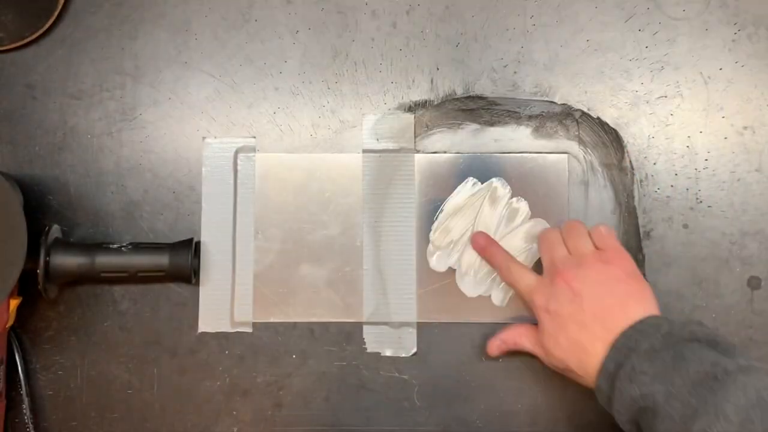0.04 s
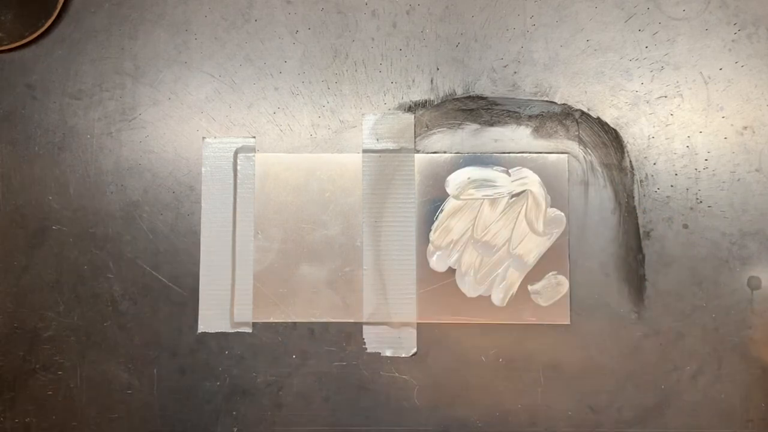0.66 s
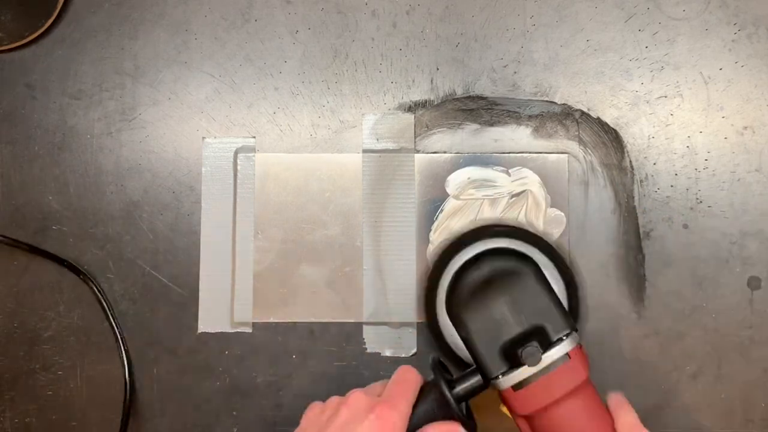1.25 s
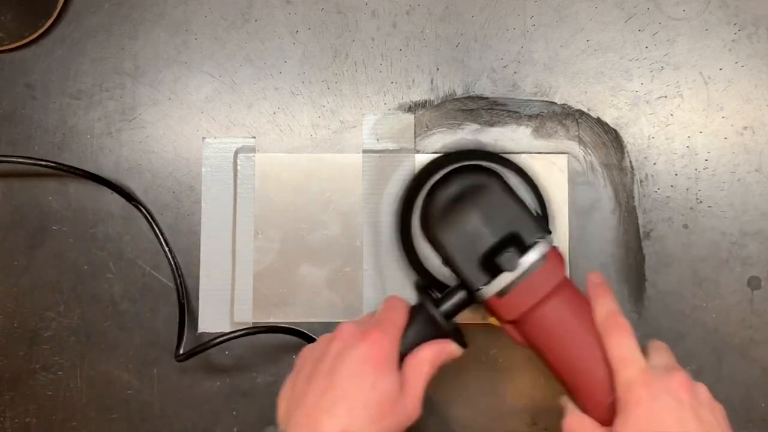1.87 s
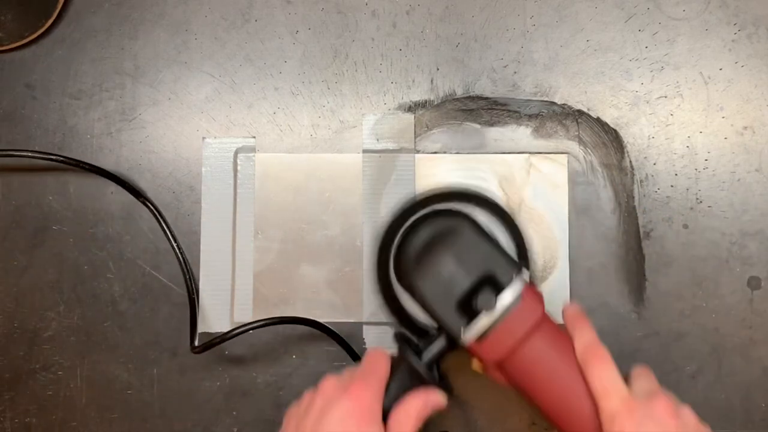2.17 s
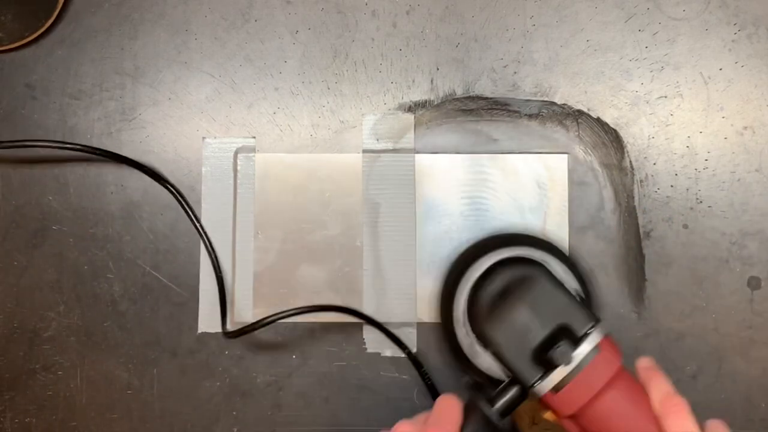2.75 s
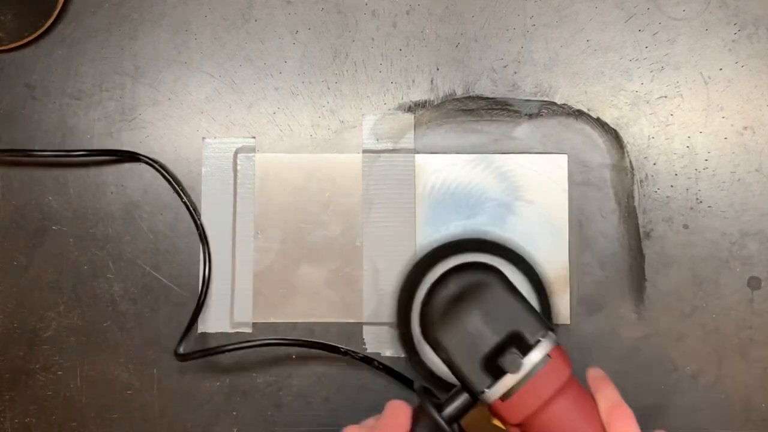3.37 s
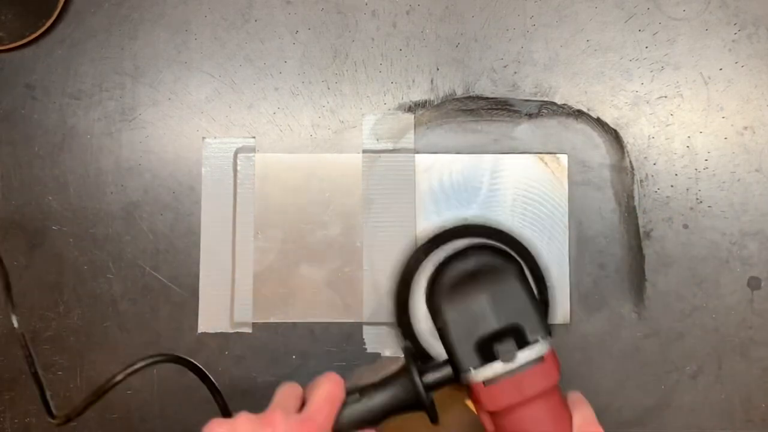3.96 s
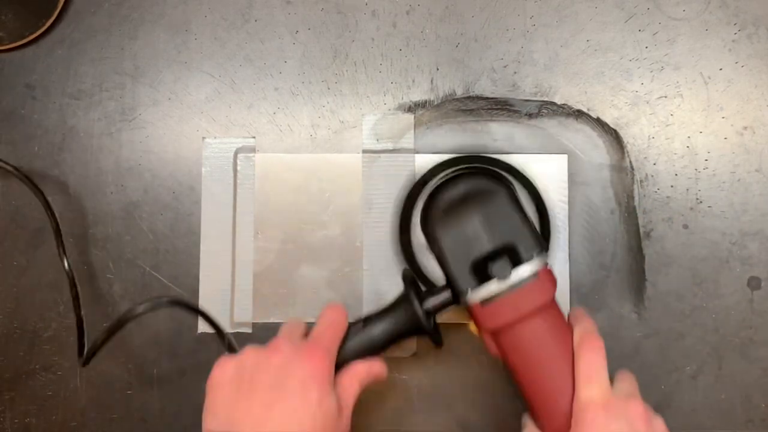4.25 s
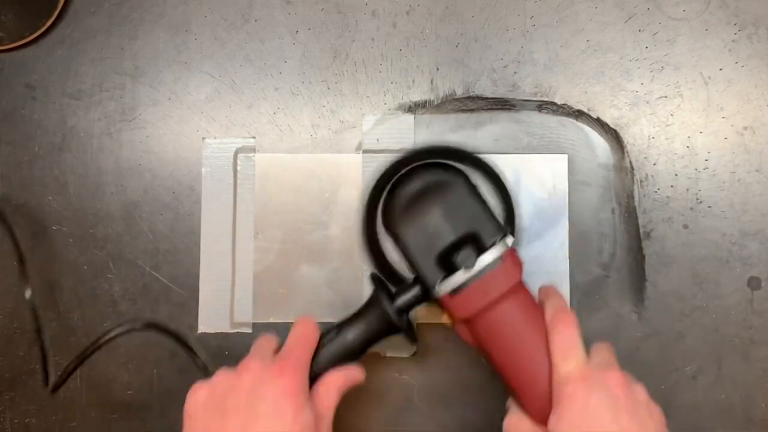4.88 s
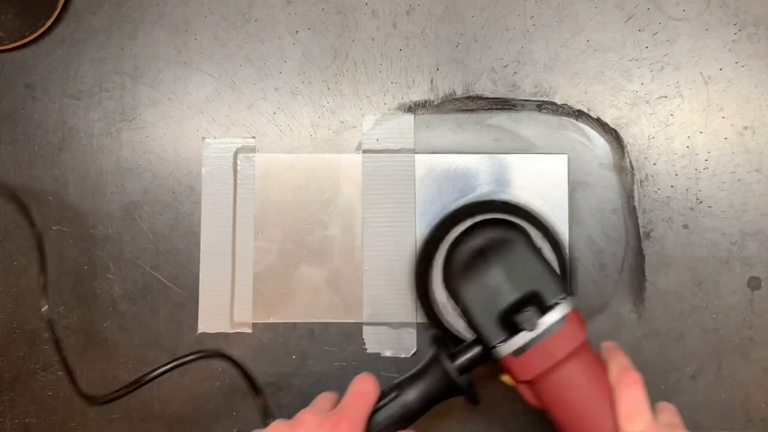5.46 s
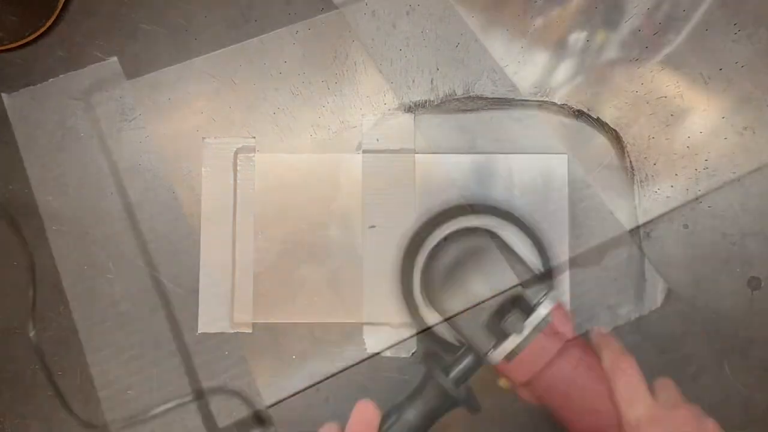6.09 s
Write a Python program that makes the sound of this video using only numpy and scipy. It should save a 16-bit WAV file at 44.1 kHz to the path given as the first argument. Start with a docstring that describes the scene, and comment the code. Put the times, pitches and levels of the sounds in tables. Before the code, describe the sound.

In a quiet workshop, a few knocks, clicks and a short rub come from a power tool being lifted off a steel bench. Then the polisher starts, spinning up fast to an even, slightly wavering motor whine with a strong airy hiss as its foam pad works over a metal plate. It keeps running and gets a little quieter at the very end. The microphone is close.

```python
"""Knocks and a soft scrape come first, as a dual-action polisher is picked up from a steel bench.
It is then switched on and run over a taped-down metal plate. Rotor unbalance gives a hum and tooth
contact a gear whine; brushes, cooling air and the foam pad give a hiss shaped by the housing resonances.
The sound is close and nearly mono, in a quiet workshop, and fades a little at the very end."""
import sys
import numpy as np
from scipy import signal
from scipy.fft import rfft, irfft, next_fast_len
from scipy.io import wavfile
from scipy.ndimage import uniform_filter1d

SR = 44100
rng = np.random.default_rng(int(sys.argv[2]) if len(sys.argv) > 2 else 0)


def generate_wav(sig):
    """Save sig (samples, or channels by samples) to the path in sys.argv[1] as 16-bit PCM at SR."""
    pcm = np.round(np.clip(np.atleast_2d(sig).T, -1, 1) * 32767).astype(np.int16)
    wavfile.write(sys.argv[1], SR, pcm)


N = 274125
T = np.arange(N) / SR


def polisher(switch_on_s=1.2795, onset_s=0.0027, waver=0.003044):
    """Frequency modulation: the orbiting pad makes the rotor waver, and hum, gears and rush follow."""
    # rotor starting, then running: t/s, rotation rate f/Hz, hum level/dB
    run_up = [(1.28, 39.99, -77), (1.305, 190.1, -56)]
    running = [(1.33, 295, -36), (1.36, 339, -30.5), (1.37, 355, -30), (1.38, 377, -44), (1.4, 395, -34.5),
               (1.42, 410, -30), (1.45, 427.5, -29), (1.52, 439.8, -27.5), (1.6, 445.4, -28),
               (1.71, 446.4, -29.5), (1.74, 444.7, -26.5), (1.86, 447, -29.5), (2.12, 442, -28),
               (2.36, 439.6, -29), (2.4, 440.5, -27), (2.49, 444, -30.5), (2.62, 442.6, -27.5),
               (2.68, 442.5, -30.5), (2.72, 442.8, -26), (2.76, 443, -30.5), (2.83, 441.4, -25.5),
               (2.88, 440.4, -30), (2.93, 443.7, -27), (3.02, 441, -29), (3.14, 443.3, -27),
               (3.17, 443.2, -29), (3.22, 440, -26.5), (3.26, 440.3, -30.5), (3.34, 439, -27),
               (3.37, 439.2, -30), (3.48, 440.8, -26), (3.53, 440, -30.5), (3.59, 440.1, -26),
               (3.66, 436.5, -30), (3.71, 437, -25.5), (3.74, 439, -29), (3.82, 439.6, -28.5),
               (3.95, 440.5, -28.5), (4.02, 442, -25), (4.13, 440, -27), (4.23, 448, -26.5),
               (4.28, 441.6, -26), (4.34, 441.5, -28.5), (4.38, 438.7, -27), (4.77, 438.4, -26.5),
               (4.81, 437.3, -29.5), (4.88, 437.6, -26.5), (4.95, 438.3, -31), (4.97, 436, -27.5),
               (5.11, 433.3, -27.5), (5.44, 434.7, -27), (5.71, 437, -27.5), (5.85, 436, -27),
               (6.09, 437, -31), (6.14, 437, -30), (6.22, 437, -34.5)]
    # rush of brushes and air: t/s, level/dB
    rush_levels = [(1.29, -33), (1.36, -34.5), (1.74, -32.5), (4.4, -33), (5.76, -32.5), (5.99, -34),
                   (6.22, -37.5)]
    motion = run_up + list(running)
    hz, hum_db, rush_db = curve(motion), curve(motion, column=2), curve(rush_levels)
    turns = np.cumsum(hz * (1 + waver * walk(22.5))) / SR
    speed = hz / np.median(hz[T > 2])  # 1 at working speed
    sound = rotor(turns, hum_db, rush_db) + gears(turns, speed) + rush(turns, speed) * undb(rush_db)
    return sound * np.clip((T - switch_on_s) / onset_s, 0, 1)


def rotor(turns, hum_db, rush_db, cage_per_turn=0.41):
    """Forced vibration: unbalance hums once a turn; bearing play smears overtones, the higher the wider."""
    # overtones: multiple of the rotation rate, level/dB re the rush
    harmonics = [(2, -17), (3, -24.5), (4, -35), (5, -35.5), (6, -31), (7, -24), (8, -18.5), (9, -20),
                 (10, -29)]
    hum = unit(np.sin(2 * np.pi * turns) * (1 + 0.075 * walk(28))) * undb(hum_db)
    overtones = sum(undb(db) * rough_line(round(k) * turns, 6.2 * k, steady=0.72) for k, db in harmonics)
    cage = undb(-27.5) * rough_line(cage_per_turn * turns, 8.7, steady=2.5)
    return hum + (overtones + cage) * undb(rush_db)


def gears(turns, speed, mesh_per_turn=39 / 11):
    """Periodic tooth contact: narrow harmonics of the mesh rate swell with speed and load on the pad."""
    # whine under load, at working speed: t/s, level/dB
    load = [(1.45, -54), (1.54, -51), (1.66, -49), (2.17, -53.5), (2.63, -50), (3.13, -52), (3.24, -49.5),
            (3.47, -51), (3.7, -52.5), (3.78, -49), (3.85, -49), (3.93, -56.5), (4.55, -51), (4.65, -63),
            (4.98, -56), (5.05, -65), (5.1, -53), (5.36, -60), (5.42, -55), (5.6, -51), (5.87, -61),
            (5.92, -55), (6.22, -61)]
    # gear partials: multiple of the mesh rate, level/dB re the load curve
    partials = [(1, -1), (2, 0), (4, -4), (5, 1)]
    contacts = mesh_per_turn * turns
    whine = sum(undb(db) * rough_line(round(k) * contacts, 13.4, steady=2.3) for k, db in partials)
    return speed ** 4 * whine * undb(curve(load))


def rush(turns, speed, pulse_depth=0.29, grain_db=0.5, flutter_db=1.0):
    """Source and filter: brush and pad friction rings the housing; at low speed the brushes spark."""
    # spectra of friction and of sparking: f/Hz, relative level/dB
    friction_spectrum = [(25, -13.5), (110, -10.5), (240, -4.5), (340, -3), (560, -4), (1100, -8),
                         (2400, -5.5), (3700, 4), (5200, 0), (8600, -1), (10800, 1.5), (12600, -1),
                         (14000, -0.5), (15500, -5.5)]
    spark_spectrum = [(120, -43), (200, -16), (414, -34), (690, -27), (1620, -13), (2170, -10), (2380, -13),
                      (4330, -7), (8820, -7.5), (10000, 3), (15500, -10)]
    # housing resonances and one notch: f/Hz, width/Hz, gain/dB
    housing = [(1326, 60, 7.5), (1710, 58, 4.5), (2086, 106, 9.5), (2555, 170, 3.5), (3620, 390, 2),
               (4000, 100, 1.5), (4370, 130, 3.5), (6030, 190, -5.5), (7570, 450, 3), (9500, 240, 3),
               (13450, 450, 2)]
    pulse = 1 + pulse_depth * np.cos(2 * np.pi * turns)
    friction = rng.standard_normal(N) * pulse * undb(grain_db * walk(1500))
    running = unit(colour(friction, friction_spectrum, housing)) * undb(0.47 + flutter_db * walk(32))
    crackle = rng.standard_normal(N) * undb(2.2 * walk(900))
    sparks = unit(colour(crackle, spark_spectrum)) * (T < 1.5)
    running_share = np.clip(speed, 0, 1) ** 3
    return running * np.sqrt(running_share) + sparks * np.sqrt(1 - running_share)


def knocks(clack_spread=1.255):
    """Impact and damped vibration: the bench top thuds, the tool body clacks and hard parts click."""
    # tool and cord strike the bench: t/s, thud gain/dB, clack level/dB, click level/dB, clack f/Hz, T60/s
    contacts = [(0.301, -45, -58, -80, 1350, 0.034), (0.4428, -23.5, -34, -44.5, 890, 0.034),
                (0.484, -41, -47, -59, 1150, .07), (0.501, -61, -54.5, -59, 1600, 0.094),
                (0.575, -58, -45, -66, 900, .04), (0.583, -42, -43, -46, 1200, 0.035),
                (0.6004, -39.5, -52, -30.5, 1100, 0.022), (0.709, -70, -47, -58, 1720, 0.029),
                (0.719, -64, -43, -54, 1730, .025), (0.758, -67, -48, -70, 1670, 0.037),
                (0.805, -68, -55, -54.5, 1100, .05), (0.861, -60, -42, -66, 990, .03),
                (0.898, -35.5, -54, -50, 1300, .05), (0.907, -36, -55, -49, 1500, 0.045),
                (0.997, -64, -60, -55, 2500, 0.047), (1.038, -68, -56, -48, 2200, .025),
                (1.054, -72, -51, -52, 2500, .04), (1.0835, -50, -43, -36, 1700, 0.03),
                (1.130, -68, -62, -46, 1800, 0.022), (1.157, -75, -50.5, -62, 1290, .025),
                (1.327, -27, -54, -60, 600, .03)]
    # modes of the bench top: f/Hz, T60/s, relative level/dB
    bench_modes = [(230, 0.07, -21), (280, 0.056, -3.5), (412, .03, -20), (641, 0.055, -13),
                   (1030, .04, -28)]
    # click on the plastic body: f/Hz, relative level/dB
    click_spectrum = [(200, 0.5), (1500, -2), (3300, -3), (4600, 4), (6200, -6.5), (10000, -6.5),
                      (15500, -7.5)]
    out, t = np.zeros(N), T[:SR // 4]
    thud = sum(undb(db - 60 * t / t60) * np.sin(2 * np.pi * hz * t) for hz, t60, db in bench_modes)
    for onset_s, thud_db, clack_db, click_db, hz, t60 in contacts:
        body = signal.butter(2, [hz / clack_spread, hz * clack_spread], "band", fs=SR, output="sos")
        clack = undb(clack_db) * unit(signal.sosfilt(body, rng.standard_normal(len(t))))
        click = undb(click_db) * unit(colour(rng.standard_normal(len(t)), click_spectrum))
        decay = undb(-60 * t / t60)
        start = int(onset_s * SR)
        out[start:start + len(t)] += undb(thud_db) * thud + decay * (clack + click)
    return out


def sliding(catch_db=3.5):
    """Sliding friction: sleeve and cord rub unevenly over the bench as the tool is lifted."""
    # rubbing strength: t/s, level/dB
    levels = [(0.36, -90), (0.43, -64.5), (0.51, -60.5), (0.56, -85), (0.62, -68), (0.68, -72), (0.80, -71),
              (0.855, -74), (0.885, -52.5), (0.92, -45.5), (0.945, -65), (1.0, -56), (1.03, -64),
              (1.10, -60), (1.125, -69), (1.18, -61), (1.27, -65.5), (1.32, -85)]
    # rubbing noise: f/Hz, relative level/dB
    spectrum = [(180, -31), (300, -1), (484, -16), (696, -1.5), (892, -18), (1220, -11), (2830, -11.5),
                (4000, -14), (7880, -6.5), (15500, -10.5)]
    return hiss(spectrum) * undb(curve(levels) + catch_db * walk(150))


def room(x, t60=0.31, wet_db=-17, delay_s=0.006):
    """Reverberation: reflections from the workshop walls add a short, dull, exponential tail."""
    t = T[:SR // 2]
    reflections = colour(rng.standard_normal(len(t)), [(200, 6), (3000, 1.5), (15000, -7)])
    tail = reflections * undb(-60 * t / t60) * (t > delay_s)
    return x + undb(wet_db) * signal.fftconvolve(x, tail / np.linalg.norm(tail))[:N]


def ventilation(murmur_db=-68):
    """Broadband and tonal noise: the ventilation murmurs under a few steady tones of a distant fan."""
    # murmur: f/Hz, relative level/dB
    spectrum = [(18, -71), (30, -41), (154, -10), (190, -3), (222, -6), (304, -3), (552, -13), (735, -5),
                (837, -20), (1270, -30), (1520, -24), (1780, -33), (5030, -34), (15000, -53)]
    # fan tones: f/Hz, level/dB
    fan = [(716, -73), (667, -80), (1502, -87), (5039, -96)]
    tones = sum(undb(db) * rough_line(hz * T, 5, steady=2.5) for hz, db in fan)
    return hiss(spectrum) * undb(murmur_db + 0.59 * walk(4)) + tones


def stereo_side(mid):
    """Decorrelation: noise that follows the treble envelope widens the top of the rush."""
    # side signal between the microphone ports: f/Hz, relative gain/dB
    width = [(40, -25), (150, -10.5), (1000, -31.5), (3000, -46), (7000, -40), (9000, -29), (11000, 4),
             (13000, 9), (15500, 10)]
    treble = colour(mid, [(600, -37), (2500, -14), (15000, -2.5)])
    envelope = np.sqrt(np.abs(uniform_filter1d(treble ** 2, size=200)))
    return colour(rng.standard_normal(N) * envelope, width) * undb(-4.0)


def undb(db):
    """Amplitude ratio of a level in decibels."""
    return 10 ** (np.asarray(db) / 20)


def unit(x):
    """Normalisation to rms 1."""
    return x / np.sqrt(np.mean(x ** 2))


def curve(rows, column=1):
    """Linear interpolation of one table column over time."""
    rows = np.array(rows)
    return np.interp(T, rows[:, 0], rows[:, column])


def walk(rate_hz):
    """Random fluctuation of rms 1, low-passed at rate_hz."""
    f = np.arange(N // 2 + 1) / T[-1]
    return unit(irfft(rfft(rng.standard_normal(N)) / (1 + (f / rate_hz) ** 4), N))


def colour(x, outline, peaks=()):
    """Spectral shaping by an outline (f/Hz, gain/dB) with resonances on top."""
    size = next_fast_len(len(x) + 4096)
    f = np.arange(size // 2 + 1) * SR / size
    hz, db = np.transpose(outline)
    gain_db = np.interp(np.log(f + 1), np.log(hz), db)
    for centre, width, lift in peaks:
        gain_db += lift / (1 + (2 * (f - centre) / width) ** 2)
    return irfft(rfft(x, size) * undb(gain_db), size)[:len(x)]


def hiss(spectrum):
    """Coloured noise of rms 1."""
    return unit(colour(rng.standard_normal(N), spectrum))


def rough_line(cycles, rate_hz, steady):
    """Line broadening: random amplitude and phase modulation around a pure tone of weight steady."""
    phase = 2 * np.pi * cycles
    return unit((steady + walk(rate_hz)) * np.sin(phase) + walk(rate_hz) * np.cos(phase))


def scene():
    """Superposition: the sources add in the mid signal; mid plus and minus side gives left and right."""
    mid = polisher() + room(knocks() + sliding()) + ventilation()
    side = stereo_side(mid)
    return np.array([mid + side, mid - side])


def record(dry, cutoff_hz=15750):
    """Band limiting: a steep elliptic low-pass removes the highest treble."""
    return signal.sosfilt(signal.ellip(12, .1, 80, cutoff_hz, fs=SR, output="sos"), dry)


dry = scene()
out = record(dry)
generate_wav(out)
```